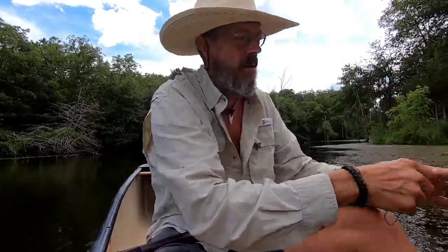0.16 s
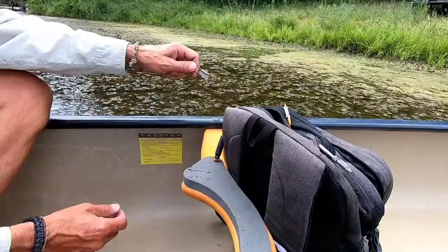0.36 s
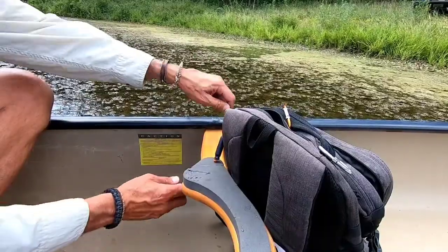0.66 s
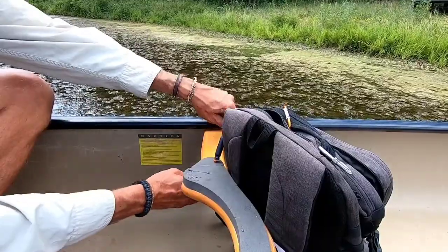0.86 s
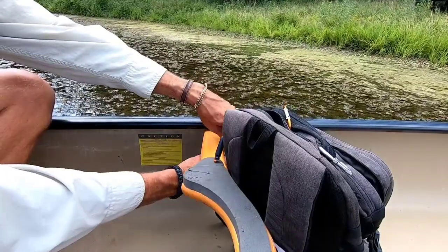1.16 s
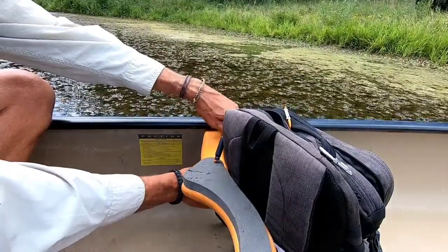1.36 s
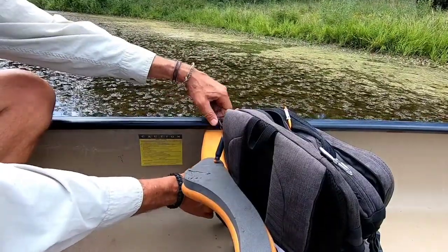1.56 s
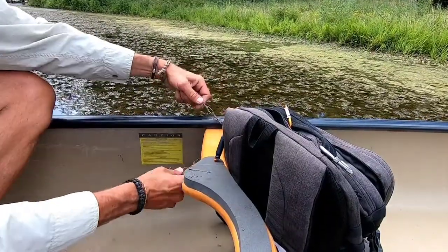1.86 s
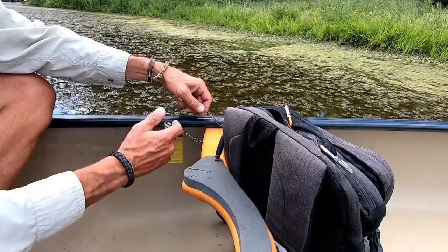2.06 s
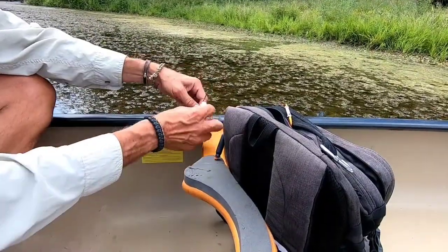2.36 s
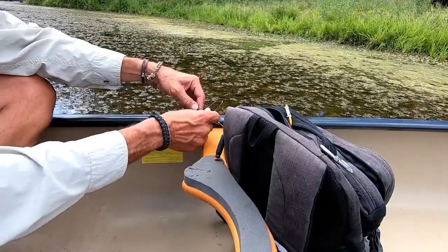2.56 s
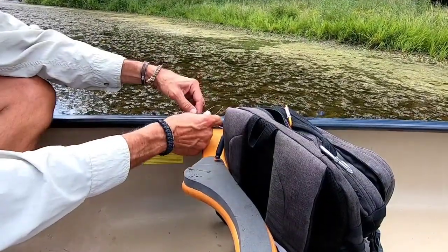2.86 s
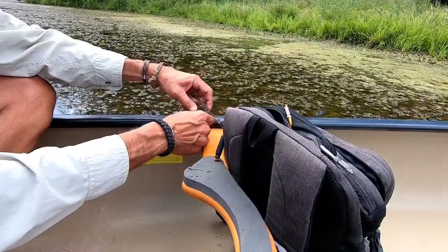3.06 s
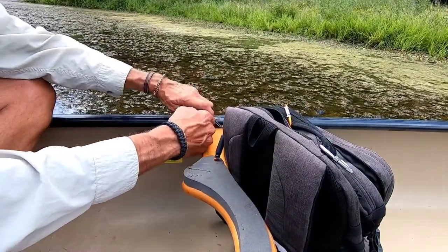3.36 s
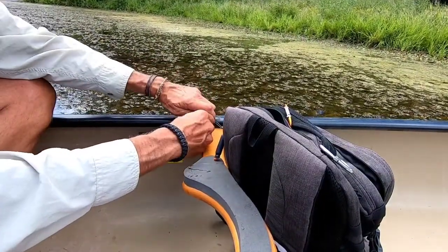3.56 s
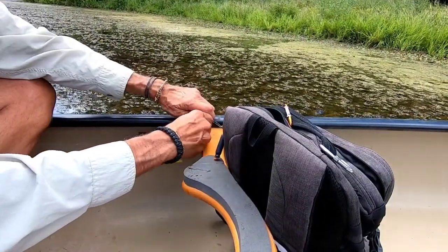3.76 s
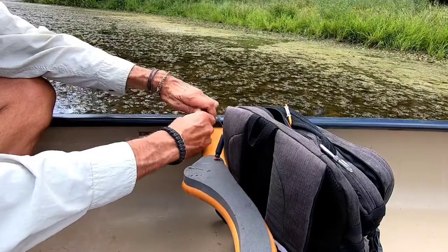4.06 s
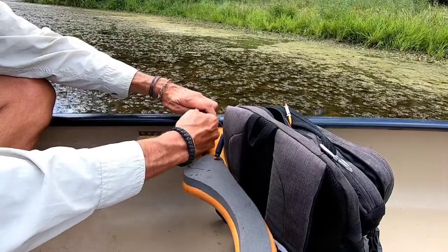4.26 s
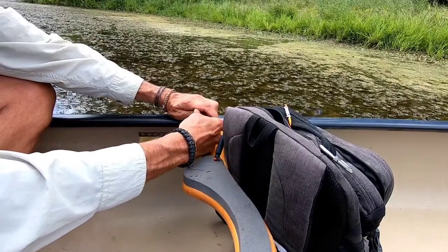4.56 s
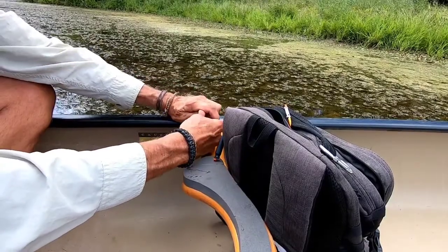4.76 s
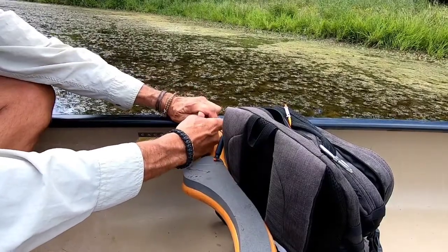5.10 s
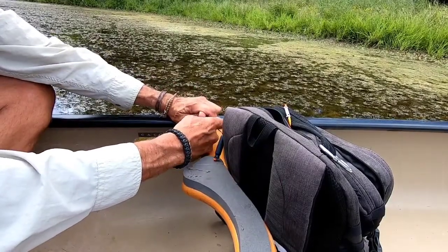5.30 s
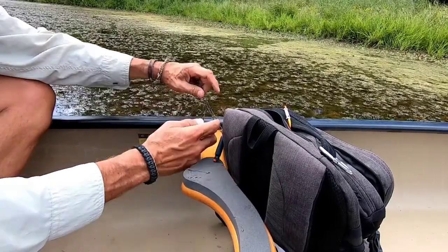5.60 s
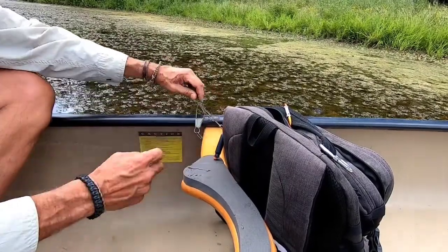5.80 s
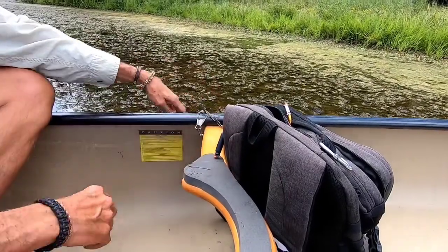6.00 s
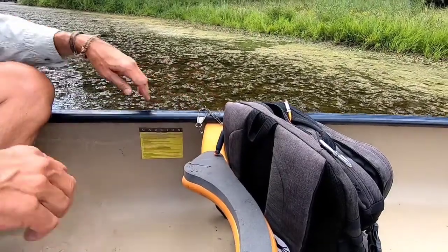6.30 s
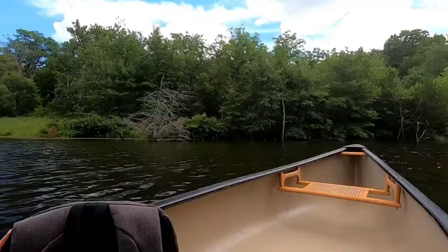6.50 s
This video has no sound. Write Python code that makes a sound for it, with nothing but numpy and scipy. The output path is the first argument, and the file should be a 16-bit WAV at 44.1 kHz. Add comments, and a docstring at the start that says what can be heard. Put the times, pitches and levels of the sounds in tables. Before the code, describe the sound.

Outdoors on quiet water, steel links strike a hollow hull with dry, short, woody-metallic clacks, picked up by a microphone fixed close by, so handling booms through. An opening burst is chopped off; a busy rattle with scrapes follows and a thin bird whistle, then isolated taps over a low wavering drone and distant insect hiss, and lastly sharp jingling knocks and an abrupt change to quiet ambience.

```python
"""Links of a small steel chain tap and rattle on the rim of a canoe as hands hook it on; the hull booms and rumbles.
Cicadas hiss from the bank, one bird whistles, a low drone wavers. Blows are noise bursts through damped hull modes,
links are ringing sines, drags are random grains on the hull, and rumble, cicadas and drone are coloured noise.
An edit mutes the sound briefly near the start; the stereo is wide at first, then near mono but for one slow swell.
"""
import sys
import numpy as np
from scipy import signal
from scipy.fft import rfft, irfft, next_fast_len
from scipy.io import wavfile
from scipy.ndimage import uniform_filter1d

SR = 44100
rng = np.random.default_rng(int(sys.argv[2]) if len(sys.argv) > 2 else 0)


def unload_audio(sound):
    """Save the sound as a 16-bit wav file, at the path given as the first command line argument."""
    columns = np.transpose(np.atleast_2d(sound))
    # keep every value between -1 and 1, then stretch to whole-number steps
    steps = np.round(np.clip(columns, -1, 1) * 32767)
    wavfile.write(sys.argv[1], SR, steps.astype(np.int16))


def level_to_linear(level):
    """Convert decibel levels to linear amplitude factors, elementwise."""
    exponent = np.asarray(level, float) / 20
    return 10 ** exponent


N = 292824
TIME = np.arange(N) / SR
FADE_IN_S = 0.39  # the sound returns after the muted gap


def bounces(peak_s):
    """A spiky noise burst for a few tiny contacts: its envelope peaks after peak_s and dies away."""
    t = np.arange(SR // 15) / SR / peak_s
    spikes = rng.standard_normal(len(t)) * level_to_linear(3.8 * rng.exponential(size=len(t)))
    return spikes * (t * np.exp(-t)) ** 2


def hull_ring(centre_hz, octaves, scatter_db, far_db=-11.5):
    """Damped modes of hull, rim and camera mount after one blow, as sum and difference of two microphones."""
    # modes: (nominal frequency [Hz], level [dB], decay by 60 dB [s])
    hull_modes = [(80, -7, .12), (120, 0, .18), (190, 0, .12), (300, -9, .06), (390, -10, .08),
                  (560, -9, .04), (790, -10, .03), (1050, -7, .035), (1310, -2, .03), (1450, 0, .03),
                  (1950, -2, .022), (2555, -3, .02), (2975, -5, .018), (3660, -5, .02), (4230, -6, .02)]
    # difference over sum at the two microphones: (frequency [Hz], level [dB])
    opposed_points = [(120, 2), (200, -16), (1200, 9.5), (2300, -26.5)]
    hz, db, t60 = (c[:, None] for c in np.transpose(hull_modes))
    t = np.arange(SR // 4) / SR
    chance = rng.standard_normal((len(hull_modes), 4))
    # where a blow lands decides which modes answer; far ones still sound at far_db
    db = db + np.maximum(-6 * (np.log2(hz / centre_hz) / octaves) ** 2, far_db)
    fade = np.exp(-np.log(1000) * t / t60)
    phase = 2 * np.pi * hz * (1 + .02 * chance[:, :1]) * t
    opposed_hz, opposed_db = np.transpose(opposed_points)
    side_db = np.interp(np.log(hz), np.log(opposed_hz), opposed_db)
    mid = level_to_linear(db + scatter_db * chance[:, 1:2]) * np.sin(phase)
    side = level_to_linear(db + side_db + scatter_db * chance[:, 2:3]) * np.sin(phase + chance[:, 3:])
    return np.array([(fade * mid).sum(axis=0), (fade * side).sum(axis=0)])


def taps():
    """Links strike the rim: bursts ring the hull over a broad clack, and neighbouring links follow each blow."""
    # blows: (time [s], peak in the dry mix [dB], centre of the ring [Hz])
    tap_rows = [(0.176, 2, 1500), (0.185, 3.5, 1484), (0.203, 0.5, 2550), (0.231, -12, 2300),
                (0.247, -19.5, 1750), (0.586, -31, 830), (0.769, -24.5, 1290), (0.832, -18.5, 1410),
                (0.858, -17, 2070), (1.248, -17.5, 930), (1.362, -19.5, 1020), (1.397, -14.5, 1230),
                (1.439, -4.5, 1390), (1.447, 0, 1830), (1.478, -6.5, 1600), (1.505, -1.5, 2000),
                (1.514, 0, 1260), (1.54, -4, 2010), (1.572, -14.5, 2000), (1.661, -6, 2170),
                (1.707, -12, 1680), (1.763, -4, 1610), (1.785, -18, 1330), (1.826, -4.5, 1950),
                (1.856, -6.5, 1430), (1.897, -18.5, 1400), (2.063, -19.5, 2300), (2.113, -10, 1480),
                (2.122, -7.5, 1620), (2.227, -16.5, 1560), (2.26, -14, 2030), (2.354, -14.5, 1820),
                (2.441, -10.5, 1300), (2.464, -27, 1150), (2.53, -21.5, 1510), (2.612, -23.5, 2750),
                (3.042, -24, 1180), (3.064, -18.5, 1330), (3.129, -17, 2000), (3.148, -9.5, 1660),
                (3.198, -25.5, 1600), (3.444, -26, 1150), (3.551, -26.5, 1100), (3.78, -24.5, 1470),
                (3.903, -27.5, 1730), (3.958, -12, 1820), (3.969, -10, 1950), (4.13, -23, 2420),
                (4.146, -21, 1540), (4.322, -18.5, 1700), (4.35, -21.5, 2110), (5.31, -19, 3320),
                (5.542, -15, 2150), (5.555, -9.5, 2190), (5.613, -2, 2580), (5.638, 1, 1740),
                (5.652, -4.5, 2760), (5.672, -8, 3640), (5.681, -7, 2140), (5.7, -9.5, 2780),
                (5.714, -20, 2670), (5.838, -25, 1160), (5.874, -5.5, 1850), (5.908, -22, 1410),
                (5.9378, -4.5, 1540), (5.973, -16.5, 2020), (6.08, -5.5, 1600), (6.096, -3.5, 1650),
                (6.18, -21.5, 1070)]
    bounce_s, settle_s, settle_db = .0042, 0.012, -15.5
    out = np.zeros((2, N))
    for s, db, hz in tap_rows:
        blow = bounces(bounce_s) + level_to_linear(settle_db) * bounces(settle_s)
        ring = signal.fftconvolve(hull_ring(hz, .55, 4), blow[None])
        clack_band = signal.butter(1, [0.83 * hz, 1.183 * hz], "band", fs=SR, output="sos")
        # the difference channel gets its own, weaker burst
        clack = signal.sosfilt(clack_band, [blow, 0.14 * bounces(bounce_s)])
        clack_gain = level_to_linear(-4) * np.abs(ring[0]).max() / np.abs(clack[0]).max()
        ring[:, :len(blow)] += clack_gain * clack
        # blows with a higher centre are brighter
        soften = signal.butter(4, 3.02 * hz, fs=SR, output="sos")
        add(out, s - bounce_s, signal.sosfilt(soften, ring), db)
    return out


def ticks():
    """Steel on steel: a thin snap that leaves the links ringing in a few high modes."""
    # link snapping on link: (time [s], peak in the dry mix [dB])
    tick_rows = [(0.183, -35.5), (1.4454, -33), (1.5047, -35.5), (1.6609, -38), (2.3512, -39.5),
                 (3.1487, -35), (5.31, -31), (5.5263, -35), (5.553, -31), (5.5747, -32.5), (5.5876, -25),
                 (5.6088, -28.5), (5.6517, -28.5), (5.9374, -24), (6.0915, -32.5)]
    # modes of the steel links: (nominal frequency [Hz], relative level [dB])
    link_modes = [(6100, -1.5), (8000, 17), (10100, 4.5), (13100, 6.5)]
    link_db, link_t60_s = -27, .06
    jingle_s, jingle_length_s, jingle_db = 5.62, .1, -38
    out, t = np.zeros((2, N)), TIME[:SR // 10]
    thin = signal.butter(2, [5000, 11000], "band", fs=SR, output="sos")
    hz, mode_db = (c[:, None] for c in np.transpose(link_modes))
    # loose links jingle as the chain drops, each up to 8 dB below jingle_db
    loose = rng.random((14, 2)) * [jingle_length_s, -8] + [jingle_s, jingle_db]
    for s, db in [*tick_rows, *loose]:
        chance = rng.standard_normal((len(link_modes), 2))
        mode_gain = level_to_linear(mode_db + 5 * chance[:, :1])
        mode_hz = hz * (1 + .06 * chance[:, 1:])
        ring = (mode_gain * np.sin(2 * np.pi * mode_hz * t)).sum(axis=0)
        ring = level_to_linear(link_db - 60 * t / link_t60_s) * ring
        snap = signal.sosfilt(thin, bounces(0.0041))
        ring[:len(snap)] += snap / np.abs(snap).max()
        add(out, s - .002, np.outer([1, -.3], ring), db)
    return out


def thuds():
    """Dull knocks through the hull: a soft, uneven shove wakes mainly the low modes."""
    # knocks: (time [s], peak in the dry mix [dB], centre of the boom [Hz])
    thud_rows = [(0.186, -6, 125.5), (1.25, -6.5, 92), (1.29, -13.5, 182), (1.487, -9.5, 89),
                 (1.826, -8.5, 180), (2.125, -18, 193), (2.448, -18, 310), (2.611, -12, 207),
                 (3.147, -15, 171), (3.551, -14, 220), (3.958, -8.5, 187), (5.315, -11, 193),
                 (5.868, -16.5, 253), (5.948, -8, 189), (6.087, -13, 190)]
    out, shove = np.zeros((2, N)), np.hanning(int(.036 * SR))
    for s, db, hz in thud_rows:
        push = shove * uniform_filter1d(rng.standard_normal(len(shove)), int(.001 * SR))
        push = push - shove * push.sum() / shove.sum()  # no net push
        boom = signal.fftconvolve(hull_ring(hz, 0.42, 2.6, far_db=-19), push[None])
        add(out, s - .009, boom, db)
    return out


def handling():
    """Uneven rumble through the mount, and links and fingers dragging in small grains that ring the hull."""
    # hands shaking the mount: (start [s], hold [s], level [dB])
    shove_rows = [(.62, 0.06, -43), (1.14, 0.44, -26), (2.07, 0.086, -28), (2.47, 0.19, -33.5),
                  (2.98, 0.2, -34), (3.97, 0.019, -26.5), (4.77, 0.049, -33.5), (5.62, 0.57, -37.5)]
    # links and fingers dragging over the rim: (start [s], hold [s], level [dB])
    drag_rows = [(.19, .08, -35), (.8, 0.336, -49.5), (1.43, 0.15, -28), (1.66, 0.23, -34.5),
                 (2.07, 0.11, -45), (2.29, 0.088, -44.5), (2.43, 0.053, -44), (2.585, 0.022, -34.5),
                 (3.03, .13, -41), (3.88, 0.16, -44), (4.1, 0.33, -54.5), (4.8, 0.015, -44.5),
                 (5.61, 0.11, -32), (5.88, 0.083, -34), (6.04, 0.079, -34), (6.185, 0.03, -44.5)]
    grains_per_s = 2500
    rumble = colour(rng.standard_normal((2, N)),
                    [(12, -20.5), (25, 1), (100, -5.0), (250, -11.0), (800, -76.0)])
    shake = swells(shove_rows, rise_db_s=94.5, fall_db_s=91.5, rest_db=-47.5)
    rumble = rumble * shake * level_to_linear(5.2 * walk(12))

    grains = rng.standard_normal(N) * (rng.random(N) < grains_per_s / SR)
    grains = grains * level_to_linear(2.32 * rng.exponential(size=N) + 3.1 * walk(70))
    # every 1 / 60 s the grains land on a randomly drawn one of eight spots of the rim
    spot = np.repeat(rng.integers(8, size=N // (SR // 60) + 1), SR // 60)[:N]
    ring = 0
    for k, hz in enumerate(np.geomspace(1000, 2800, num=8)):
        landed = (grains * (spot == k))[None]
        ring = ring + signal.oaconvolve(landed, hull_ring(hz, 0.83, 7.2), axes=1)[:, :N]
    ring = colour(ring, [(300, -22), (1600, 3.5), (12000, -25)])
    rasp = colour(grains + 0.22 * rng.standard_normal((2, N)),
                  [(120, -16.5), (400, 4.0), (1300, -16), (4000, -23.5), (12000, -53.5)])
    drag = swells(drag_rows, rise_db_s=595, fall_db_s=551, rest_db=-61)
    return rumble + (ring + 1.52 * rasp) * drag


def bird():
    """One thin whistle: a sine that rises, levels off and fades."""
    start_s, length_s, peak_db, fade_db_s = 1.567, 0.16, -36.5, 42
    from_hz, to_hz, glide_s = 3100, 3400, .05
    out, t = np.zeros((2, N)), np.arange(int(length_s * SR)) / SR
    hz = to_hz + (from_hz - to_hz) * np.exp(-t / glide_s)
    shape = np.hanning(len(t)) ** 0.25 * level_to_linear(-fade_db_s * t)
    whistle = np.sin(2 * np.pi * np.cumsum(hz) / SR) * shape
    add(out, start_s, np.outer([1, .5], whistle), peak_db)
    return out


def cicadas():
    """A far chorus: quarter-octave bands of hiss, each flickering on its own."""
    # spectrum of the chorus: (frequency [Hz], level [dB])
    chorus_points = [(500, -39), (1400, -17), (2600, -14.5), (3250, -2), (4900, -1.5), (5600, -13),
                     (7100, -17), (8100, -20), (8900, -35), (10800, -41.5), (11600, -100)]
    chorus_db = -45
    out = 0
    for hz in 500 * 2 ** np.arange(0, 4.8, .25):
        edges = [(hz * 0.94, -40), (hz * 0.96, 0), (hz * 1.12, 0), (hz * 1.18, -40)]
        band = colour(rng.standard_normal((2, N)), edges)
        out = out + band * np.sqrt(hz) * level_to_linear(1.07 * walk(19))
    mid, side = colour(out, chorus_points)
    # the chorus is widest in the treble
    side = signal.sosfilt(signal.butter(1, 7000, "high", fs=SR, output="sos"), side)
    return np.array([mid, side]) * level_to_linear(chorus_db + 1.0 * walk(0.73))


def hum():
    """A low drone: narrow-band noise that wavers, nearly central."""
    # slow course of the drone: (time [s], level [dB])
    hum_rows = [(1.0, -59), (3.3, -39), (6.4, -39.5)]
    drone = colour(rng.standard_normal((2, N)), [(120, -30), (163, 0), (205, -30), (SR / 40, -120)])
    level_db = np.interp(TIME, *np.transpose(hum_rows))
    return drone * level_to_linear(level_db + 3 * walk(4)) * [[1], [level_to_linear(-21.5)]]


def colour(x, points):
    """Shape the spectrum of x to points of (frequency [Hz], level [dB]), then scale to rms 1."""
    hz, db = np.transpose(points)
    size = next_fast_len(x.shape[-1])
    log_f = np.log(np.fft.rfftfreq(size, 1 / SR) + 1)
    gain = level_to_linear(np.interp(log_f, np.log(hz), db))
    y = irfft(rfft(x, size) * gain, size)[..., :x.shape[-1]]
    return y / np.sqrt(np.mean(y ** 2))


def walk(rate):
    """Random levels held 1 / rate s and smoothed twice; spread near 1."""
    k = int(SR / rate)
    held = np.repeat(rng.standard_normal(N // k + 1), k)
    return 1.045 * uniform_filter1d(uniform_filter1d(held, k), k)[:N]


def add(out, s, sound, db):
    """Mix a sound in from time s, its sum channel peaking at db in the dry mix."""
    i = int(s * SR)
    n = min(sound.shape[1], N - i)
    out[:, i:i + n] += sound[:, :n] * level_to_linear(db) / np.abs(sound[0]).max()


def swells(rows, rise_db_s, fall_db_s, rest_db):
    """Gain of gestures that build, hold and die away, added over a resting level."""
    out = level_to_linear(rest_db)
    for s, hold, db in rows:
        rise = rise_db_s * np.maximum(s - TIME, 0)
        fall = fall_db_s * np.maximum(TIME - s - hold, 0)
        out = out + level_to_linear(db - rise - fall)
    return out


def ramp(start, length):
    """Straight rise from 0 to 1."""
    return np.clip((TIME - start) / length, 0, 1)


def width():
    """Gain of the left-right difference: wide up to the gap, then near mono but for one slow swell."""
    first_db, mono_db, widest_db = 5, -49, 6.5
    widen_s, widest_s, narrowed_s = 4.69, 5.56, 6.376
    opening = ramp(widen_s, widest_s - widen_s) ** 2.26
    closing = (1 - ramp(widest_s, narrowed_s - widest_s)) ** 2.27
    later = level_to_linear(mono_db) + level_to_linear(widest_db) * opening * closing
    return np.where(TIME < FADE_IN_S, level_to_linear(first_db), later)


def edit():
    """Edit gain: a hard cut with a short tail, a fade-in after the gap, a late cut that fades up quieter."""
    first_cut_s, first_db, tail_db, tail_fall_db_s = .268, -5, -16, 1496
    fade_length_s, second_db = 0.14, -2
    last_cut_s, last_db, last_fade_s = 6.541, -7.5, 0.031
    tail = tail_db - tail_fall_db_s * (TIME - first_cut_s)
    first = level_to_linear(np.where(TIME < first_cut_s, first_db, tail))
    second = level_to_linear(second_db) * ramp(FADE_IN_S, fade_length_s) * (TIME < last_cut_s)
    last = level_to_linear(last_db) * ramp(last_cut_s, last_fade_s)
    return first + second + last


def scene():
    """Every layer as sum and difference, then left and right."""
    mid, side = taps() + ticks() + thuds() + handling() + bird() + cicadas() + hum()
    side = side * width()
    return np.array([mid + side, mid - side])


def roll_off(x):
    """The treble ends steeply here."""
    return signal.sosfilt(signal.butter(12, 15900, fs=SR, output="sos"), x)


def record(dry):
    """Raise the level with rounded peaks, then apply the edit."""
    rounded = np.tanh(1.186 * dry) / 0.91
    return roll_off(rounded * edit())


dry = scene()
out = record(dry)
unload_audio(out)
```